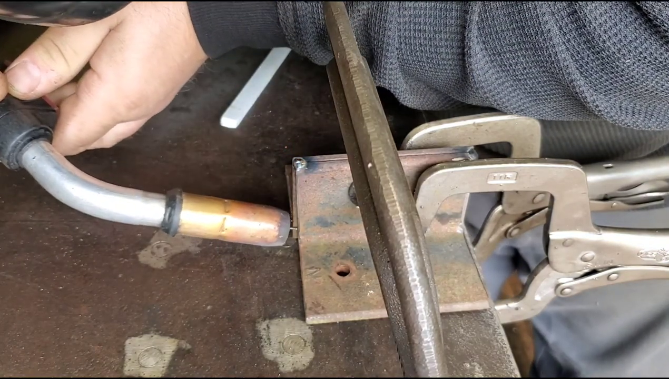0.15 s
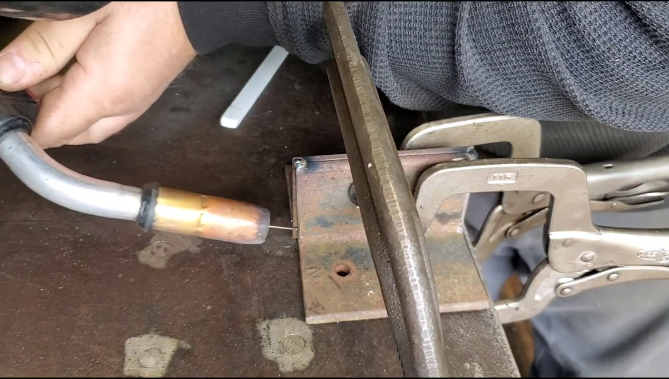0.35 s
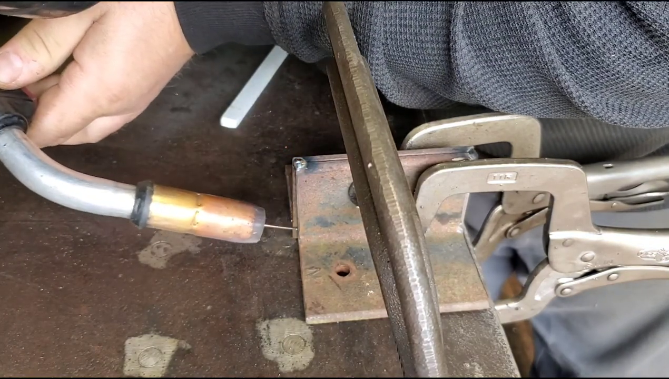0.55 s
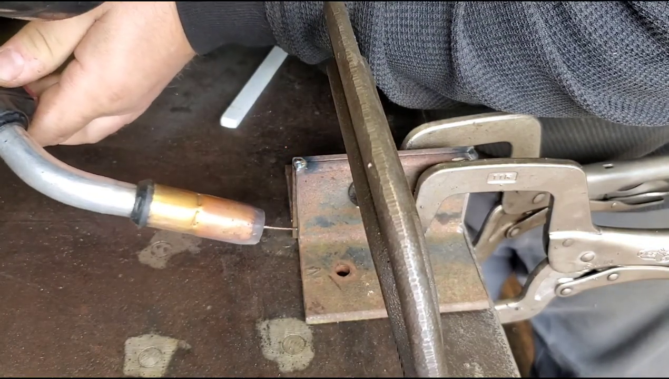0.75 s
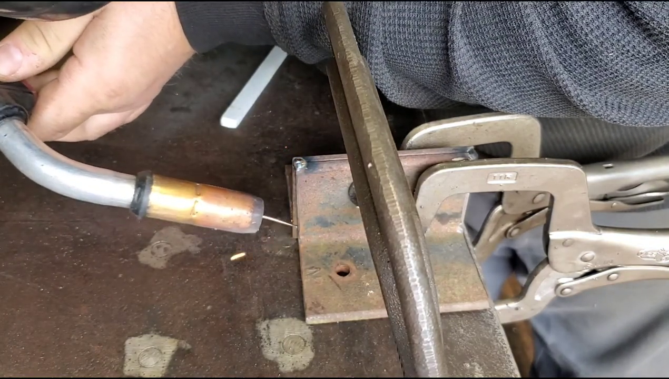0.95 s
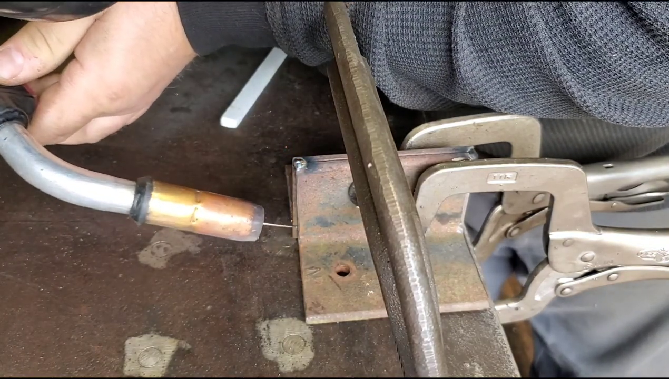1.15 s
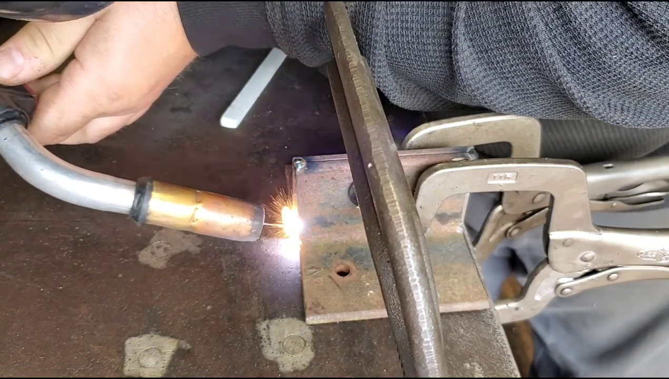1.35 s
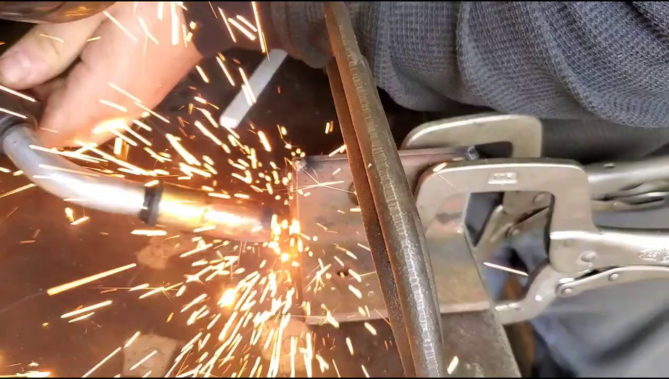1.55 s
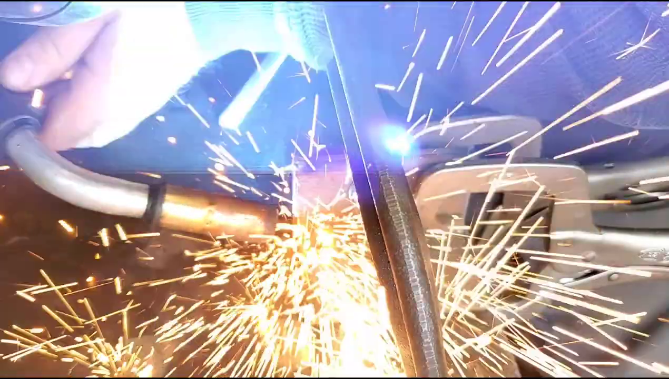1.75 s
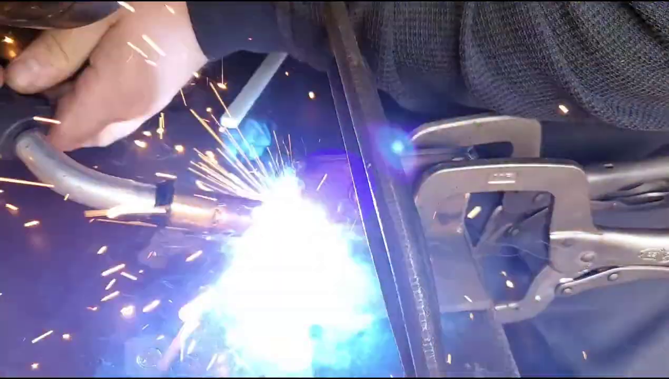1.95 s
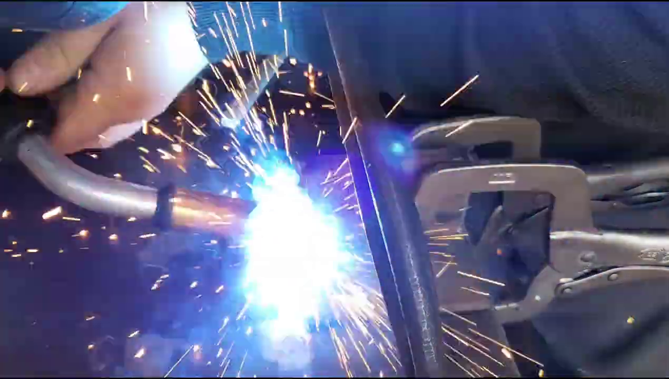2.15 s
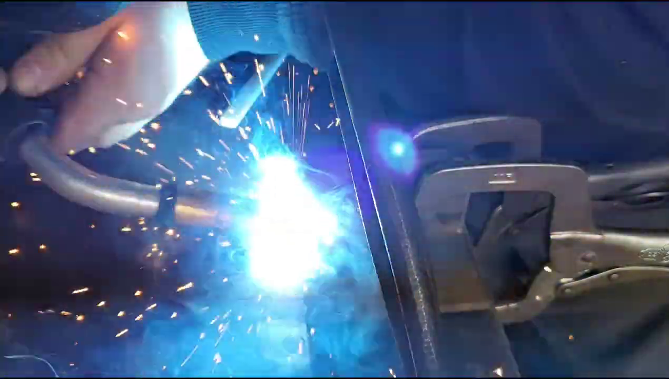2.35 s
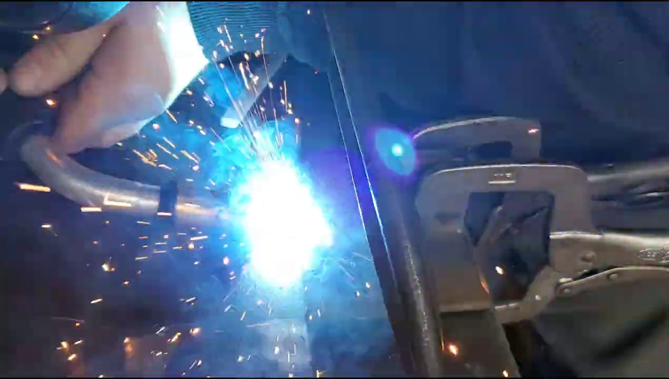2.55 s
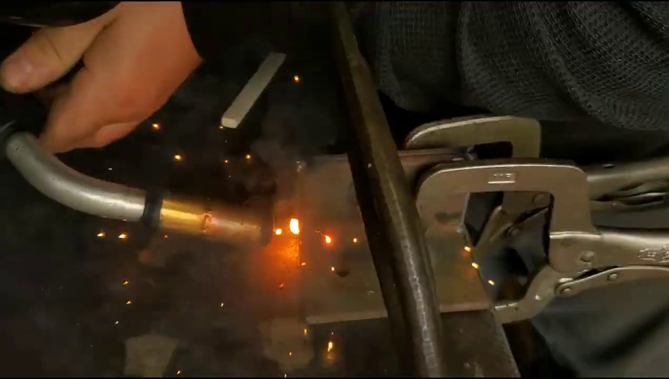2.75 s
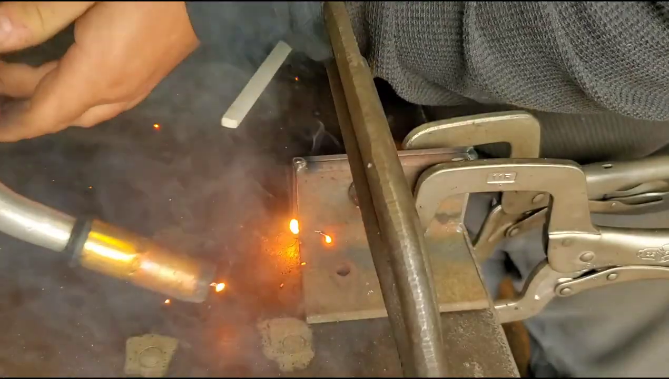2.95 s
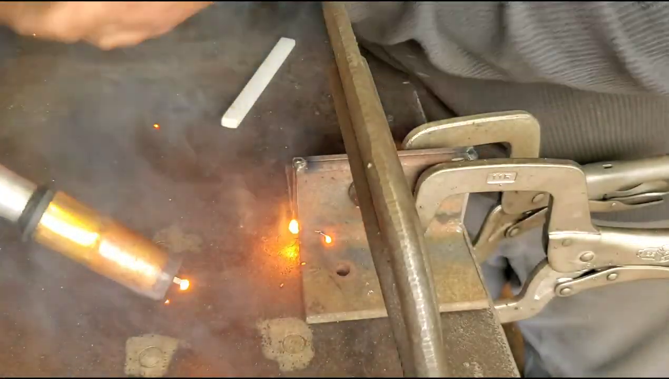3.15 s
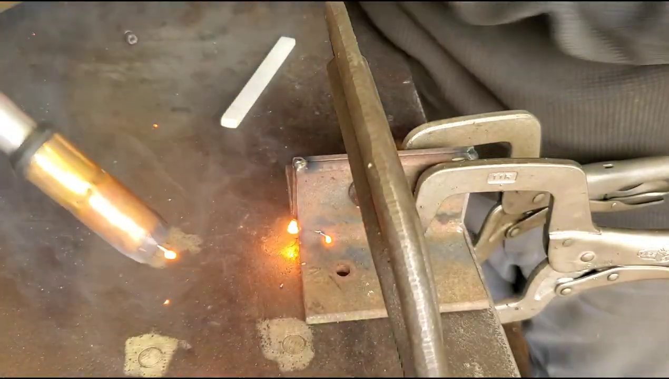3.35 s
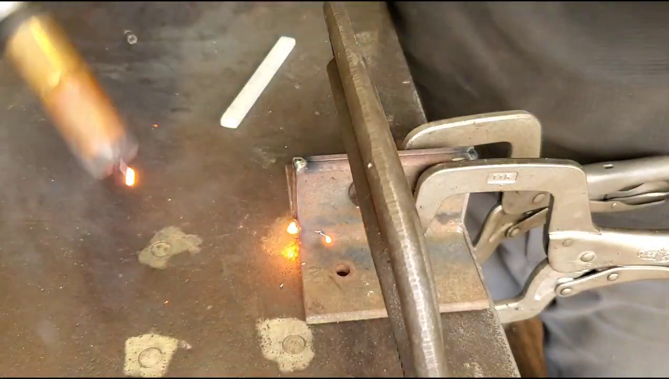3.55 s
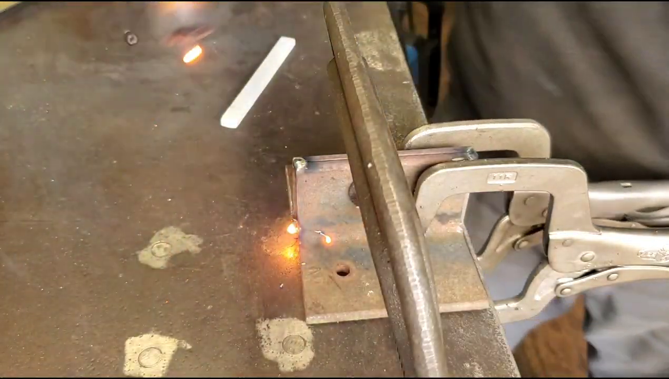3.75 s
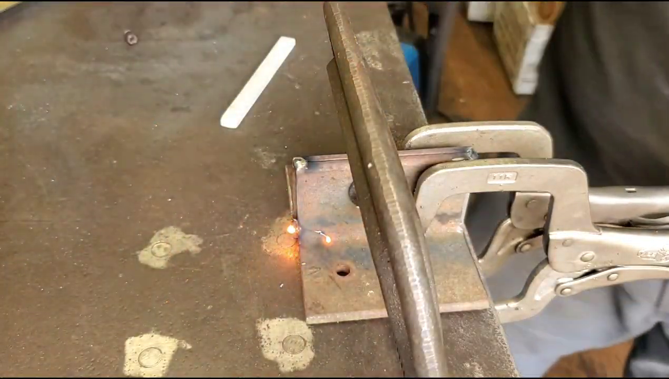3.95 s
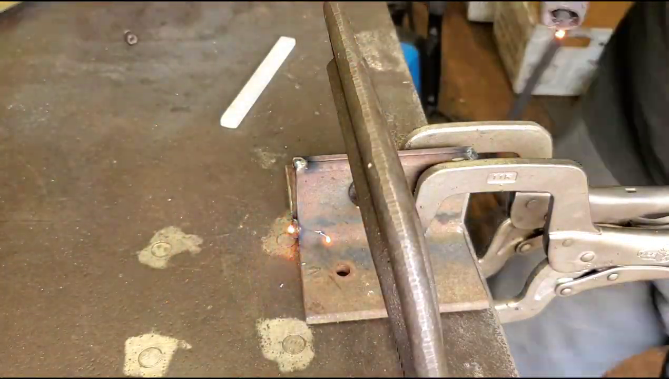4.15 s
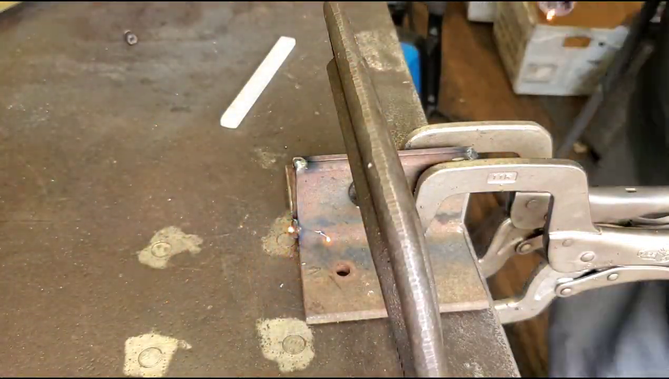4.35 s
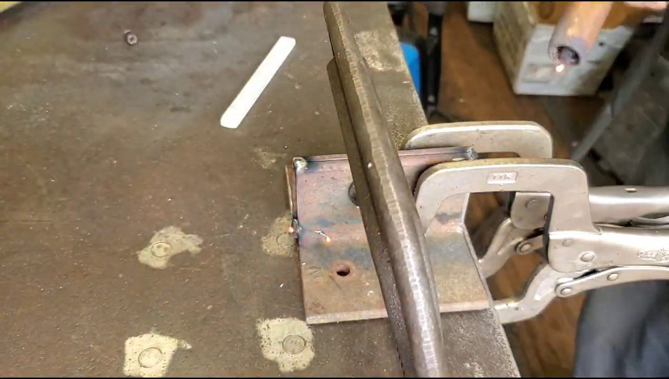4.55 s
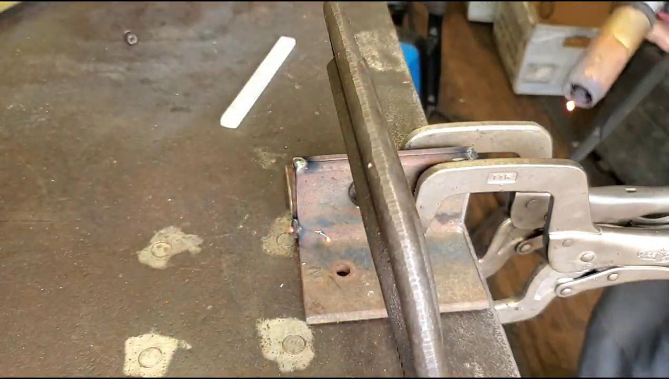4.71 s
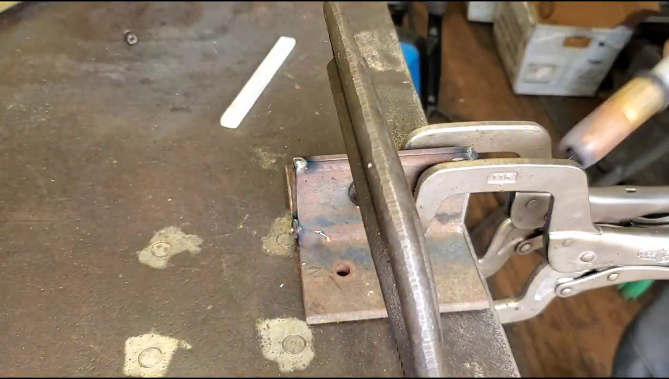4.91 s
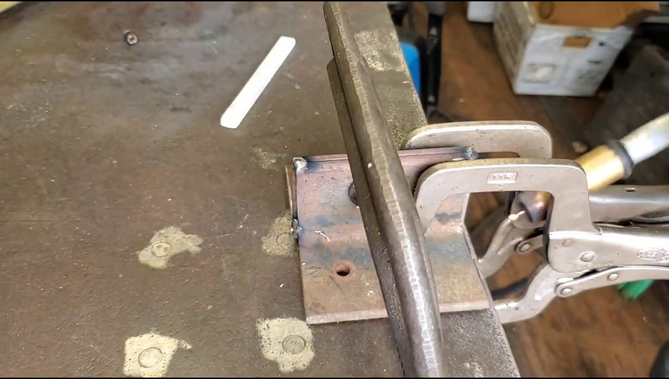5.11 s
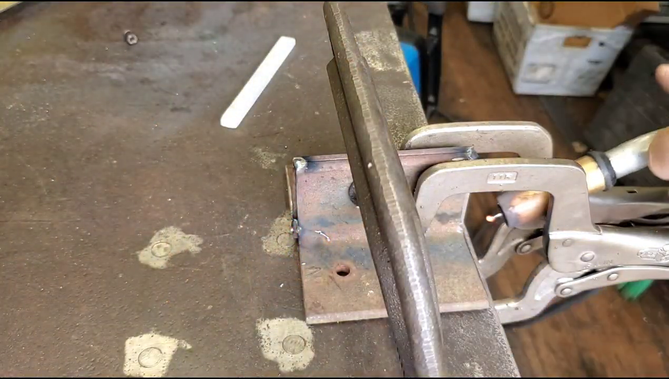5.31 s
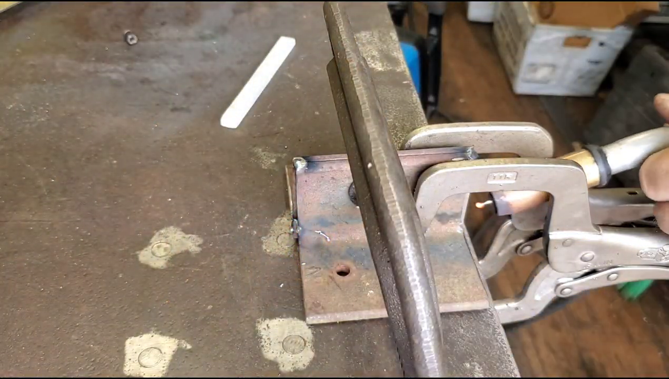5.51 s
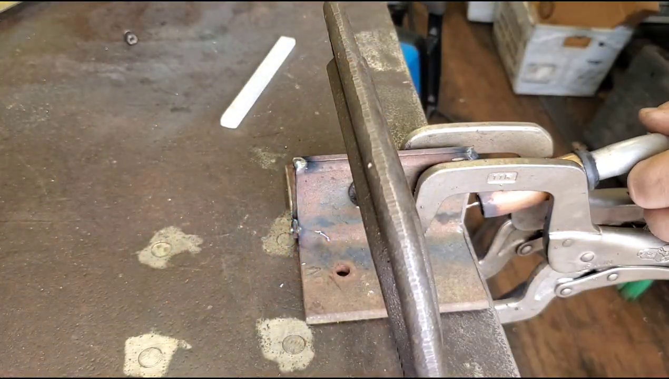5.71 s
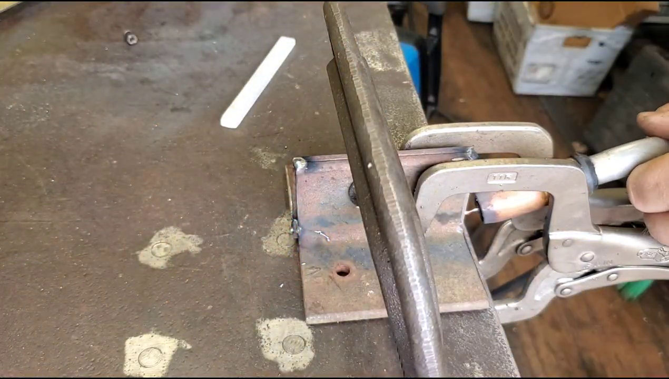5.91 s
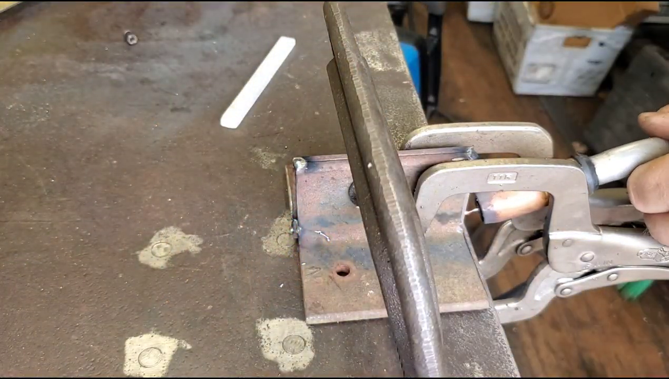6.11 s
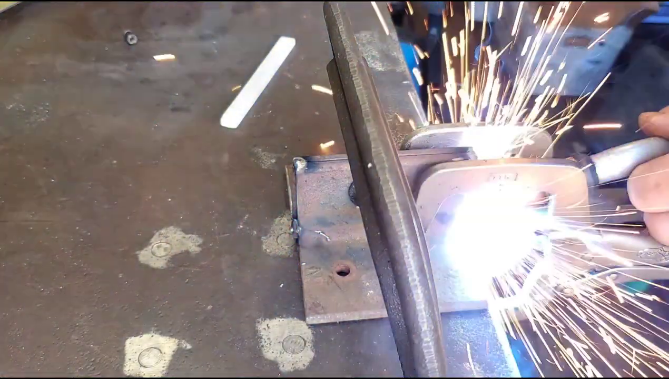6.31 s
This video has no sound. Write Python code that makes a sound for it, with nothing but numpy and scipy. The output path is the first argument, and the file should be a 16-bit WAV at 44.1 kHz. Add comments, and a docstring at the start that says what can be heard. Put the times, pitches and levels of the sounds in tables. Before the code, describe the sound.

A close, brief tack weld on steel in a small workshop. The torch gives a puff of hissing gas over a low transformer hum, then sharp, uneven pops turn into about a second of dense crackling and sizzling. After a lull, shoes scuff the floor, clothing rustles and metal is knocked with a short ring. A very faint squeak follows, and the arc pops to life again.

```python
"""A wire-feed welder in a small workshop, its transformer humming. First the trigger is squeezed briefly:
gas hisses and the feed motor runs. Then the arc strikes, stutters and settles into a fast crackle of
short circuits on clamped steel plates, while molten metal sizzles. After the weld the hum sinks away.
It comes back as someone shuffles round the table, knocking metal and sliding the torch along the clamp.
A faint squeak follows, and a second weld begins right at the end."""
import sys
import numpy as np
from scipy import signal
from scipy.fft import rfft, irfft, next_fast_len
from scipy.io import wavfile
from scipy.ndimage import uniform_filter1d, map_coordinates

SR = 44100
rng = np.random.default_rng(int(sys.argv[2]) if len(sys.argv) > 2 else 0)


def wav_out(sig):
    """Save sig, one row per channel (or a flat mono array), as 16-bit PCM at SR to the path in sys.argv[1]."""
    wavfile.write(sys.argv[1], SR, np.round(np.clip(np.atleast_2d(sig).T, -1, 1) * 32767).astype(np.int16))


N = 280917

# how alike left and right are, for close and for spread-out sounds: f/Hz, likeness (1 = the same)
CLOSE_LIKENESS = [(100, 1), (500, 0.64), (3000, 0.33), (9000, .2)]
SPREAD_LIKENESS = [(60, 1), (300, 0.76), (1000, 0.13), (5000, .1)]
# violent strikes of the stuttering arc: t/s, pressure spike/dB, spatter burst/dB, crack/dB, air puff/dB
ARC_STRIKES = [(1.018, -48, -22, -22, -55), (1.469, -11, -14, -19, -24.5),
               (1.522, -23.5, -23.5, -16.5, -44), (1.5931, -16, -16, -12.5, -16.5),
               (1.677, -12, -12, -17, -43.5), (1.808, -8.5, -19, -18, -39.5),
               (1.8374, -9.5, -19.5, -13.5, -37.5), (1.871, -12.5, -13, -11.5, -23.5),
               (1.9327, -20, -25.5, -19.5, -44), (1.9557, -14.5, -20, -8.5, -34.5),
               (2.136, -13, -15.5, -18.5, -29), (6.3068, -16, -46, -10, -48)]


def arc():
    """Each short circuit makes a pressure spike and throws spatter; hot metal sizzles, the steel rings."""
    # tone colour of flying spatter: f/Hz, level/dB
    spatter_colour = [(120, -33), (200, 1), (538, -19.5), (671, -9), (749, -2), (1020, -12.5), (1320, 0.5),
                      (1560, -6.5), (3130, -0.5), (7270, 0), (8120, -10), (15100, 2.5), (16000, 4)]
    # ringing notes of the torch and plates: f/Hz, width/Hz, level/dB
    steel_notes = [(3060, 100, -1), (3380, 60, -1.5), (3650, 90, -3), (4030, 56, 0.5), (4400, 37, -8.5),
                   (5700, 67, -6), (7080, 52, -7)]
    times, spike_db, burst_db = short_circuits().T
    t = np.arange(SR // 8) / SR
    push = np.exp(-((t - .0001) / .00005) ** 2)
    suction = 0.14 * np.exp(-((t - .0007) / 0.00074) ** 2)
    direct = after(train(times, spike_db), 1.5 * (push - suction))
    spikes = np.array([direct - 0.1 * np.roll(direct, early) + .35 * np.roll(direct, late)
                       for early, late in ((24, 110), (48, 94))])  # echoes off the plates, in samples
    fading = (1 - np.exp(-t / 0.00065)) * (amp(-60 * t / .022) + 0.33 * amp(-60 * t / 0.076))
    spatter = noise(tint(spatter_colour), CLOSE_LIKENESS)
    bursts = after(train(times, burst_db), 1.23 * fading) * spatter
    sizzle = molten_metal() * spatter
    strike_times, _, _, crack_db, puff_db = np.transpose(ARC_STRIKES)
    cracks = after(train(strike_times, crack_db), amp(-60 * t / .009)) * spatter
    ring = filtered(2.5 * cracks + .8 * spikes + 0.59 * (bursts + sizzle), resonances(steel_notes))
    swing = np.sin(np.sqrt(t / 0.00022)) * amp(-60 * t / 0.067)  # the air swings slower and slower
    puffs = after(train(strike_times, puff_db), swing)
    return spikes + puffs + bursts + cracks + ring + sizzle


def short_circuits():
    """All shorts as rows of time, spike and burst; in the settled arc, ordinary ones fill the gaps."""
    # shorts that stand out of the crackle: t/s, pressure spike/dB, spatter burst/dB
    pops = [(1.4826, -19, -20.5), (1.5378, -32, -17.5), (1.564, -23.5, -27), (1.798, -26.5, -24.5),
            (1.9855, -28, -19.5), (2.013, -24, -24.5), (2.0264, -22, -17), (2.0421, -27, -18.5),
            (2.0584, -18, -25), (2.0764, -18, -24), (2.0893, -15, -24.5), (2.1023, -10.5, -18.5),
            (2.1571, -7, -22.5), (2.168, -10, -20), (2.223, -7.5, -24.5), (2.2369, -12, -16),
            (2.3175, -13, -22), (2.3336, -16, -15.5), (2.3886, -14.5, -33.5), (2.434, -13, -16),
            (2.5045, -9.5, -26.5), (2.524, -13, -18), (2.5565, -12, -19.5), (2.6273, -13.5, -22),
            (2.6517, -14.5, -15.5), (2.6785, -12.5, -20), (2.6992, -12.5, -21.5), (6.2975, -22.5, -24.5),
            (6.3446, -13, -20), (6.3564, -16, -38)]
    settled_from_s, settled_to_s, shorts_per_s = 2.1, 2.69, 90
    standouts = np.array(sorted([row[:3] for row in ARC_STRIKES] + pops))
    marks = [s for s in standouts[:, 0] if settled_from_s < s < settled_to_s]
    times = np.concatenate([np.linspace(a, b, max(round((b - a) * shorts_per_s), 1) + 1)[1:-1]
                            for a, b in zip(marks, marks[1:])])
    ordinary = np.array([(s, -15, -26) for s in times])  # same columns as the pops
    scatter = rng.standard_normal(ordinary.shape) * [0.0011, 2.5, 3.5]
    return np.vstack([standouts, ordinary + scatter])


def molten_metal():
    """Strength of the sizzle while the arc is lit, roughened by tiny droplets landing."""
    # surges of sizzling: start/s, rise/s, hold/s, fall/(dB/s), level/dB
    surges = [(1.462, 0.0096, 0.17, 403.5, -32.5), (1.66, 0.0075, 0.0085, 262, -46),
              (1.782, 0.013, 0.1, 299.5, -39), (1.864, .03, .015, 401, -29.5),
              (1.948, 0.021, .02, 119, -34), (2.018, 0.061, .5, 61.5, -33.5),
              (2.658, 0.018, 0.018, 1198.5, -37), (6.31, 0.023, .1, 300, -28)]
    droplet_count, arc_out_s = 5000, 2.71
    sizes_db = np.minimum(6 * rng.exponential(size=droplet_count), 20)
    landing = amp(-60 * np.arange(200) / SR / 0.0035)
    droplets = after(train(rng.uniform(0, N / SR, size=droplet_count), sizes_db), landing)
    lit = swells(*np.transpose(surges))
    lit[round(arc_out_s * SR):round(surges[-1][0] * SR)] = 0  # no sizzle between the welds
    return lit * (0.55 + .4 * unit(droplets))


def gas_jet():
    """Shielding gas hisses through the cup of the torch while the trigger is held."""
    # trigger squeezes: press/s, release/s, steady jet/dB, first spurt/dB
    squeezes = [(0.197, 0.657, -27.5, -22.5), (6.226, 6.4, -30.5, -27.5)]
    # tone colour of the gas: f/Hz, level/dB
    gas_colour = [(290, -40.5), (500, -3.5), (855, -12.5), (1230, -0.5), (1950, -7.5), (2650, -8),
                  (5020, -5.5), (6700, -10), (16000, -8.5)]
    # ringing notes of the cup: f/Hz, width/Hz, level/dB
    cup_notes = [(1380, 1400, -17.5), (1995, 180, 1), (3170, 260, -7.5), (5050, 91, 0), (7260, 260, 2),
                 (8300, 102, -10), (8730, 94, 0), (13400, 1570, 1.5)]
    valve_share, valve_s = 0.19, 0.00206  # part of the flow is there as soon as the valve opens
    jet_rise_s, spurt_rise_s = 0.038, 0.036
    jet_fall_db_s, spurt_fall_db_s, shut_db_s = 30, 90, 620
    press, release, jet_db, spurt_db = np.transpose(squeezes)[:, :, None]
    t = np.maximum(np.arange(N) / SR - press, 0)
    shut_db = shut_db_s * np.maximum(t + press - release, 0)
    opening = 1 - valve_share * np.exp(-t / valve_s) - (1 - valve_share) * np.exp(-t / jet_rise_s)
    flow = opening * amp(jet_db - jet_fall_db_s * t - shut_db)
    surge = (1 - np.exp(-t / spurt_rise_s)) ** 2 * amp(spurt_db - spurt_fall_db_s * t - shut_db)
    through_cup = lambda hz: tint(gas_colour)(hz) * (1 + 3.8 * np.abs(resonances(cup_notes)(hz)))
    jet = flow.sum(0) * noise(through_cup, CLOSE_LIKENESS)
    spurt = surge.sum(0) * noise(resonances([(5090, 1000, 0)]), CLOSE_LIKENESS)  # the first rush sings
    return (jet + spurt) * amp(wobble(40))


def feed_motor():
    """The motor that feeds the wire shakes its housing."""
    # one loudness curve for each squeeze: t/s, level/dB
    runs = [
        [(.195, -52), (.213, -33), (.259, -37), (.393, -40), (.503, -32), (.653, -38.5), (.72, -42.5)],
        [(6.225, -48), (6.253, -32), (6.311, -56)],
    ]
    # low notes of the housing: f/Hz, width/Hz, level/dB
    housing_notes = [(66.3, 18, -6), (87.7, 10, -12.5), (124.6, 12.2, 1), (218.2, 7.8, 2.5),
                     (314.3, 14.2, -4.5)]
    return fader(*runs) * noise(resonances(housing_notes), SPREAD_LIKENESS)


def handled_metal():
    """Knocked metal rings briefly and the table answers with a dull bump; small parts click."""
    # small knocks: t/s, clank/dB, bump/dB, time to fade by 60 dB/s
    knocks = [(3.6, -84.5, -64.5, 0.051), (3.71, -88, -62, 0.085), (4.33, -63, -33.5, 0.37),
              (5.075, -30, -44, 0.23), (5.73, -85, -56, 0.075)]
    # ringing notes of the metal: f/Hz, width/Hz, level/dB
    metal_notes = [(2246, 68, 9.5), (2980, 85, 2), (3480, 100, -1), (4320, 52, 7), (4970, 88, 0),
                   (5530, 170, -2), (12200, 17000, -33.5)]
    # tiny clicks of trigger, wire and cooling metal: t/s, level/dB
    click_events = [(0.179, -50), (.968, -67), (1.0, -66), (1.448, -52), (2.969, -64), (3.601, -72),
                    (6.209, -56)]
    # their bright tone colour: f/Hz, level/dB
    click_colour = [(1200, -39.5), (3000, -5.5), (5500, 1.5), (9000, -9), (13000, -4.5), (16000, -8.5)]
    clank, bump = np.zeros((2, N + SR))
    t = np.arange(SR // 2) / SR
    touch = 1 - np.exp(-t / 0.00087)  # soft contact
    for start, clank_db, bump_db, fade_s in knocks:
        clank[round(start * SR):][:len(t)] += amp(clank_db - 60 * t / fade_s) * touch
        bump[round(start * SR):][:len(t)] += amp(bump_db - 60 * t / fade_s) * touch
    clanks = clank[:N] * noise(resonances(metal_notes), CLOSE_LIKENESS)
    bumps = bump[:N] * noise(resonances([(654, 200, 9), (1610, 400, -10)]), CLOSE_LIKENESS)
    click = after(train(*np.transpose(click_events)), amp(-60 * t / .03) * touch)
    return clanks + bumps + click * noise(tint(click_colour), CLOSE_LIKENESS)


def shuffle():
    """Soles and cable rub the floor in grainy strokes; clothing rustles."""
    # strokes: start/s, rise/s, hold/s, fall of the thud/(dB/s), thud/dB, scuff/dB, cloth/dB
    strokes = [(3.052, .012, 0.029, 102, -67, -55, -62), (3.783, .02, 0.27, 25, -58.5, -71, -74),
               (4.098, 0.047, .005, 90, -38, -44.5, -73), (4.315, 0.04, 0.032, 100.5, -28.5, -30, -51),
               (4.51, 0.048, 0.12, 99.5, -48.5, -53, -57.5), (4.629, 0.027, 0.043, 98, -34, -39.5, -49.5),
               (4.704, 0.046, 0.026, 73.5, -31, -38.5, -58), (4.78, 0.037, 0.033, 144, -37, -52, -43),
               (5.07, .015, 0.0058, 146, -64, -41.5, -47), (5.09, 0.058, 0.13, 149, -27, -35.5, -53),
               (5.337, 0.031, 0.039, 25, -44.5, -60.5, -79)]
    # tone colours of low thud, floor scuff and cloth: f/Hz, level/dB
    thud_colour = [(18, -56), (30, -8.5), (125, 8), (172, -11), (205, -6), (358, -9), (644, -37),
                   (746, -45), (802, -28), (1000, -24.5), (1300, -83), (2200, -120)]
    scuff_colour = [(290, -9), (500, -4.5), (645, -5.5), (742, -3.5), (946, -14.5), (1370, -10.5),
                    (6800, -32), (8000, -48), (10400, -46), (17600, -120)]
    cloth_colour = [(2350, -16), (4000, -4), (4360, -13), (6980, -8), (7880, -17), (15200, -9), (16000, -6)]
    start, rise, hold, fall, thud_db, scuff_db, cloth_db = np.transpose(strokes)
    grain = amp(0.66 * wobble(90) + 1.34 * wobble(25.12))
    thud = swells(start, rise, hold, fall, thud_db) * noise(tint(thud_colour), SPREAD_LIKENESS)
    scuff = swells(start, rise, hold, 1.65 * fall, scuff_db) * noise(tint(scuff_colour), SPREAD_LIKENESS)
    flutter = amp(2.24 * wobble(60))
    cloth = swells(start, rise, hold, 2 * fall, cloth_db) * noise(tint(cloth_colour), SPREAD_LIKENESS)
    return thud + grain * scuff + flutter * cloth


def torch_slide():
    """The torch slides along the clamp, which sings faintly and unevenly."""
    # loudness of the slide: t/s, level/dB
    slide = [(5.2, -80), (5.3, -75), (5.42, -72.5), (5.5, -73), (5.55, -92)]
    # high notes of the clamp: f/Hz, width/Hz, level/dB
    clamp_notes = [(5500, 440, 2), (9800, 170, 4), (13900, 1200, -3)]
    return fader(slide) * amp(4.8 * wobble(18)) * noise(resonances(clamp_notes), SPREAD_LIKENESS)


def hum_and_air():
    """Mains current makes the transformer hum, a little unsteadily, over the noise of the room."""
    # both sink after the weld and come back: t/s, gain/dB
    dip = [(0, 2), (1.45, 2.5), (1.55, 0.5), (2.6, -3), (2.85, -12.5), (3.05, -19), (3.4, -22),
           (3.8, -11.5), (4.1, -3), (4.3, 3.5), (6.37, 3)]
    # tones of the hum: f/Hz, level before that gain/dB
    hum_tones = [(120, -47), (180, -69), (280, -78.5), (360, -61)]
    # tone colour of the room noise: f/Hz, level/dB
    air_colour = [(15, -48.5), (30, -22), (64, -6.5), (100, -13.5), (175, -18.5), (300, -21), (430, -23.5),
                  (860, -28.5), (2000, -46.5), (5000, -61), (10000, -65), (16000, -57)]
    t = np.arange(N) / SR
    lead = np.array([[.2], [-.2]])  # radians: the hum reaches the left side a little earlier
    hum = 0
    for hz, db in hum_tones:
        strength = amp(db + 0.5 + 1.1 * wobble(7.8))
        cycles = hz * t + .03 * wobble(12) + rng.random()
        hum += strength * np.sin(2 * np.pi * cycles + lead)
    air = amp(-55.5 + 0.73 * wobble(1.5)) * noise(tint(air_colour), SPREAD_LIKENESS)
    return fader(dip) * (hum + air)


def squeak():
    """A thin, rough, faint squeak just before the second weld."""
    # its loudness: t/s, level/dB
    loudness = [(5.9, -94.5), (6.06, -68.5), (6.21, -75.5), (6.24, -78)]
    return fader(loudness) * noise(lambda hz: resonances([(2600, 60, 0)])(hz) ** 2, CLOSE_LIKENESS)


def workshop(x):
    """The room's echo of x, in which each frequency dies away at its own speed."""
    # length of the echo (the metal table lingers near 3.6 kHz): f/Hz, time to fade by 60 dB/s
    fade_times = [(200, 0.37), (2000, 0.23), (3100, 0.2), (3600, 0.29), (4200, 0.2), (6000, 0.22),
                  (14000, 0.11)]
    hz, t, spectrum = signal.stft(rng.standard_normal((2, SR // 2)), SR, nperseg=256)
    tail = signal.istft(spectrum * amp(-60 * t / along(fade_times, hz)[:, None]), SR, nperseg=256)[1]
    delayed = np.pad(x, ((0, 0), (200, 0)))
    return signal.fftconvolve(delayed, tail / np.linalg.norm(tail[0]), axes=1)[:, :N]


def amp(db):
    """Turn decibels into a gain to multiply by."""
    return 10 ** (np.asarray(db) / 20)


def unit(x):
    """Scale x to an average power of 1."""
    return x / np.sqrt(np.mean(x ** 2) + 1e-20)


def along(points, hz):
    """Read between (f/Hz, value) points on a logarithmic frequency scale."""
    freqs, values = np.transpose(points)
    return np.interp(np.log(hz + 1), np.log(freqs + 1), values)


def tint(points):
    """Turn a tone colour table into a gain for any frequency."""
    return lambda hz: amp(along(points, hz))


def resonances(notes):
    """How something with these ringing notes answers each frequency."""
    return lambda hz: sum((-1) ** k * amp(db) * 1j * hz * width / (centre ** 2 - hz ** 2 + 1j * hz * width)
                          for k, (centre, width, db) in enumerate(notes))


def filtered(x, response):
    """Scale and delay each frequency of x as the response says."""
    size = next_fast_len(N + SR // 2)
    return irfft(rfft(x, size) * response(np.fft.rfftfreq(size, 1 / SR)), size)[..., :N]


def noise(colour, likeness):
    """Stereo noise of power 1 with a given tone colour and left-right likeness."""
    def response(hz):
        turn = np.arccos(np.clip(along(likeness, hz), -1, 1)) / 2
        return colour(hz) * [np.cos(turn), np.sin(turn)]
    mid, side = filtered(rng.standard_normal((2, N)), response)
    return unit(np.array([mid + side, mid - side]))


def fader(*curves):
    """A smooth gain that follows (t/s, level/dB) curves and is silent outside them."""
    t = np.arange(N) / SR
    gain = sum(amp(np.interp(t, s, db, left=-200, right=-200)) for s, db in map(np.transpose, curves))
    return uniform_filter1d(gain, size=90, mode="nearest")


def swells(start, rise, hold, fall, db, rise_db=18):
    """Add up gains that rise, hold and fall along straight lines in dB."""
    steps = np.arange(0, N + 32, 32)
    t = steps[:, None] / SR - start
    below_db = rise_db * np.clip(1 - t / rise, 0, 1) + fall * np.maximum(t - rise - hold, 0)
    shapes = amp(db - below_db) * (t > 0)
    return np.interp(np.arange(N), steps, shapes.sum(1))


def wobble(rate):
    """A smooth curve through `rate` random values a second."""
    return map_coordinates(rng.standard_normal(int(N * rate / SR) + 4), [np.arange(N) * rate / SR])


def train(times, db):
    """A one-sample pulse for each event."""
    return np.bincount(np.round(np.asarray(times) * SR).astype(int), amp(db), N + SR)[:N]


def after(pulses, shape):
    """Start a copy of the shape at every pulse."""
    return signal.fftconvolve(pulses, shape)[:N]


def scene():
    """Mix all sources; only the close ones get the room's echo."""
    close = arc() + gas_jet() + feed_motor() + handled_metal() + torch_slide()
    return close + amp(-11.5) * workshop(close) + shuffle() + hum_and_air() + squeak()


def record(dry):
    """Two microphones colour the sound differently and drop the deepest bass and highest treble."""
    # how much louder the left side is: f/Hz, left over right/dB
    balance = [(100, 1.26), (350, -1), (700, -0.5), (1400, -1), (4000, 0.5), (9000, 1.4), (13000, -2)]
    # sound reaches the two sides at different moments: f/Hz, lead of the left/radians
    lead = [(300, -0.12), (1000, -0.52), (5000, -0.95), (14000, -1.6)]
    top_hz, bass_hz = 15830, 45
    sides = lambda hz: amp(np.outer([.5, -.5], along(balance, hz)))
    timing = lambda hz: np.exp(np.outer([.5j, -.5j], along(lead, hz)))
    treble_cut = lambda hz: np.clip((top_hz - hz) / 200, 0, 1) ** 2
    bass_cut = lambda hz: (1j * hz / (bass_hz + 1j * hz)) ** 2
    return filtered(dry, lambda hz: sides(hz) * timing(hz) * treble_cut(hz) * bass_cut(hz))


dry = scene()
out = record(dry)
wav_out(out)
```